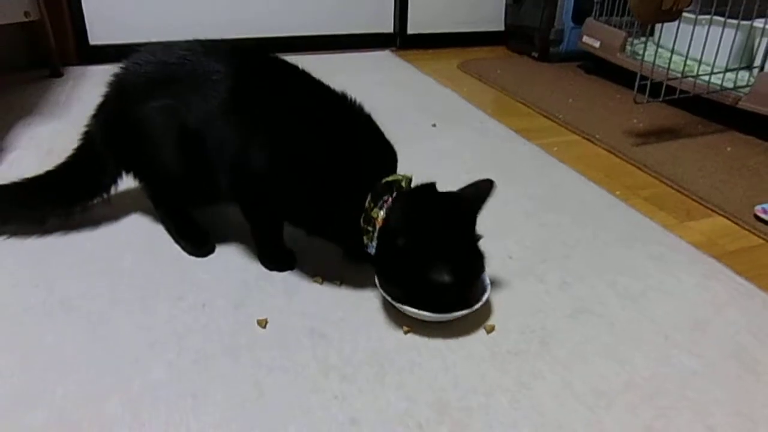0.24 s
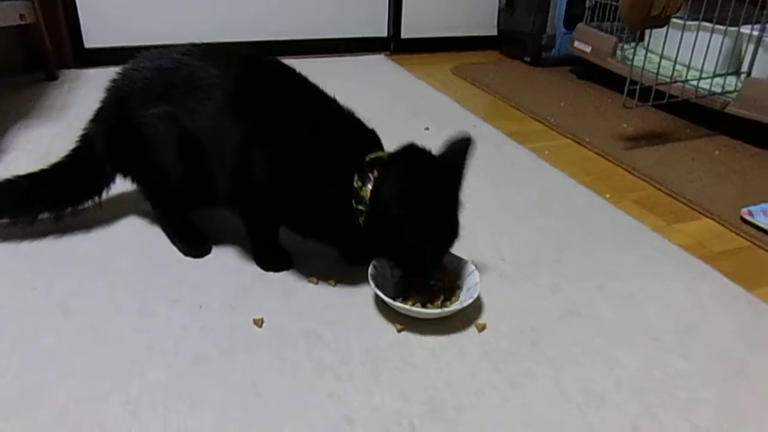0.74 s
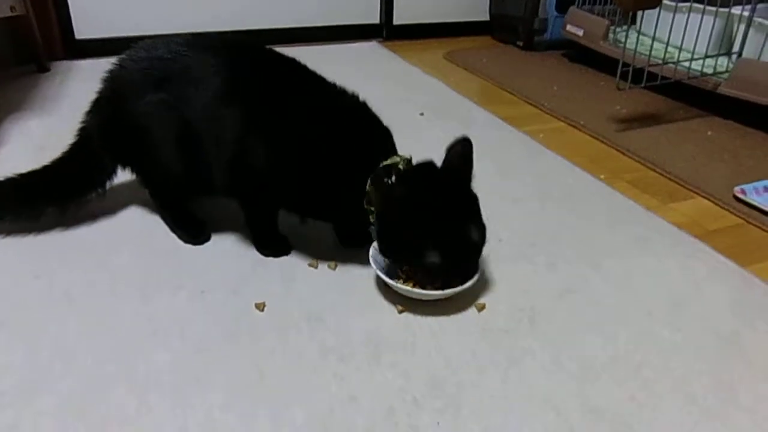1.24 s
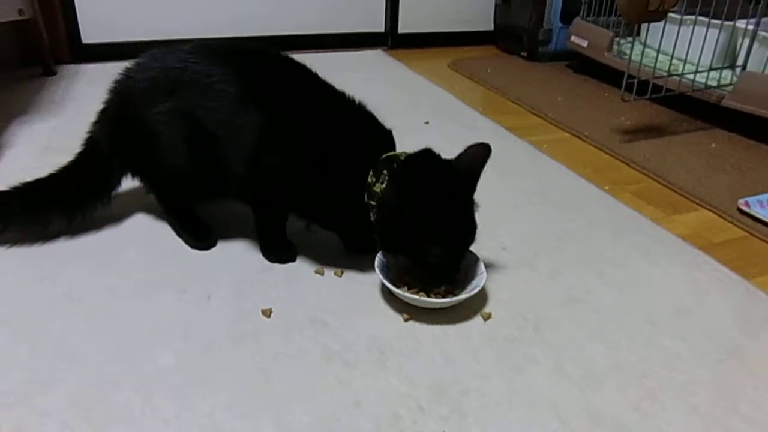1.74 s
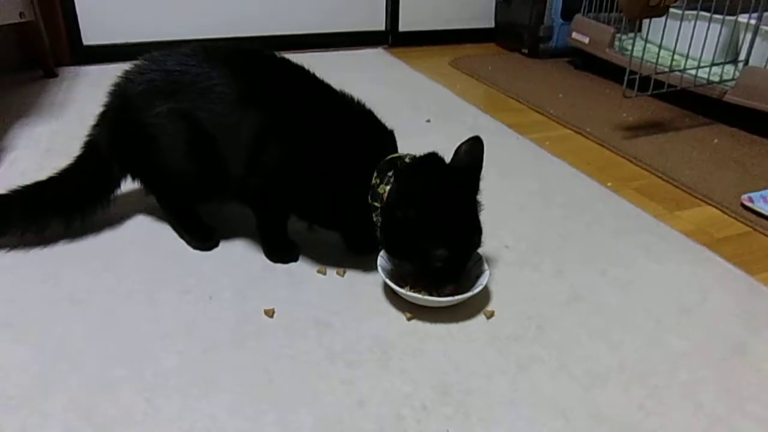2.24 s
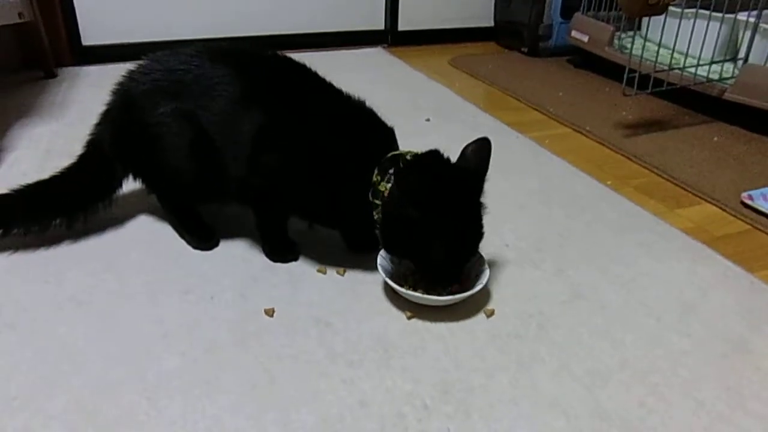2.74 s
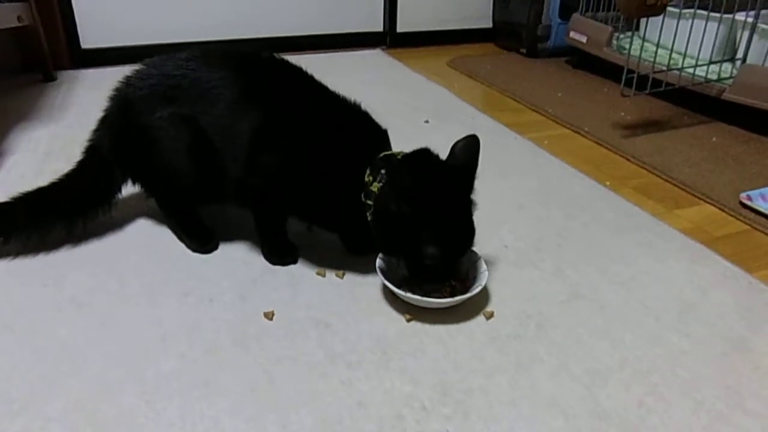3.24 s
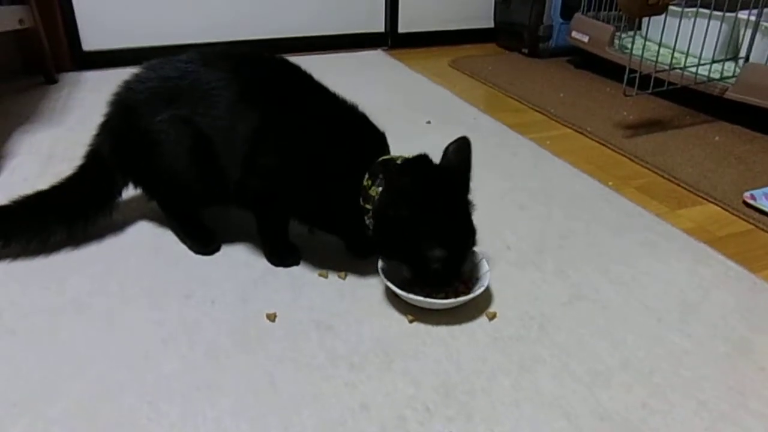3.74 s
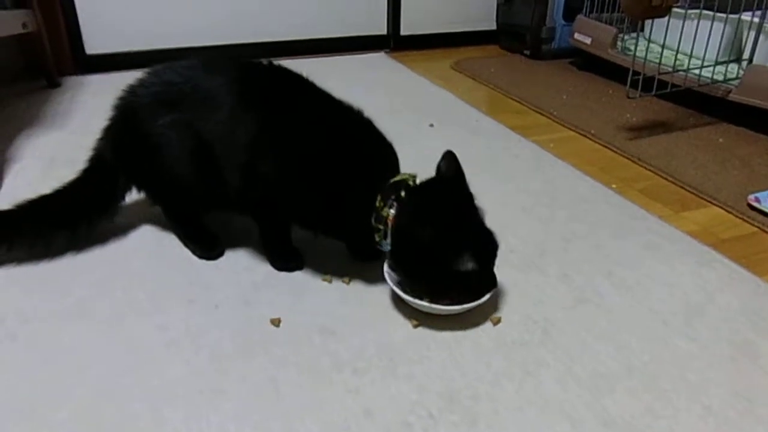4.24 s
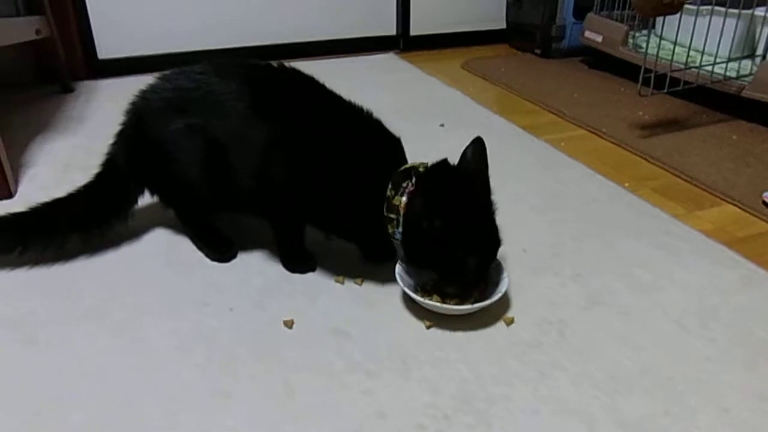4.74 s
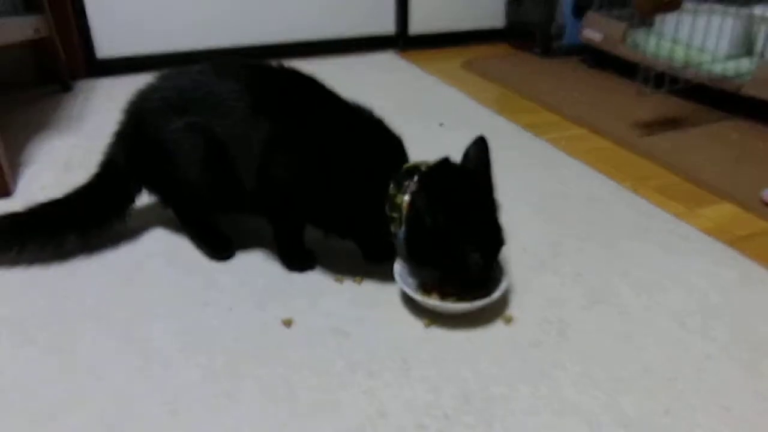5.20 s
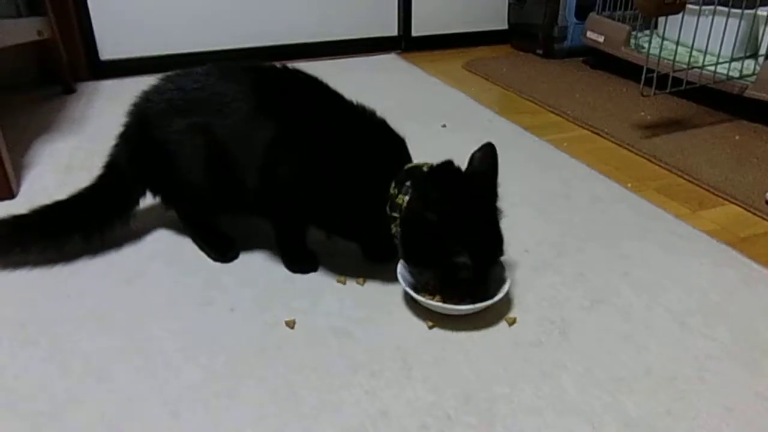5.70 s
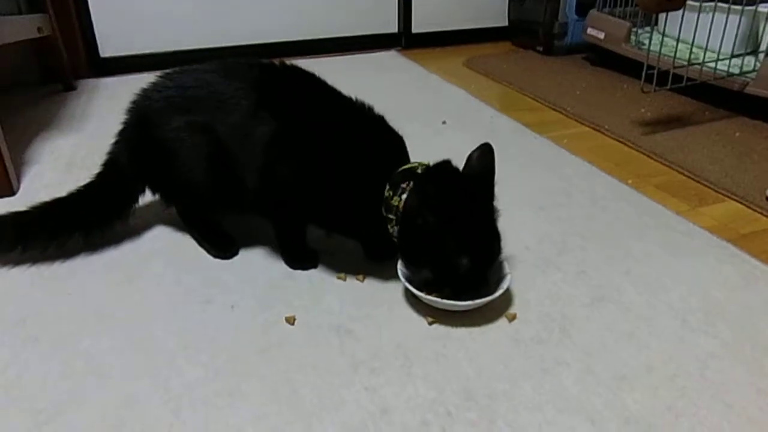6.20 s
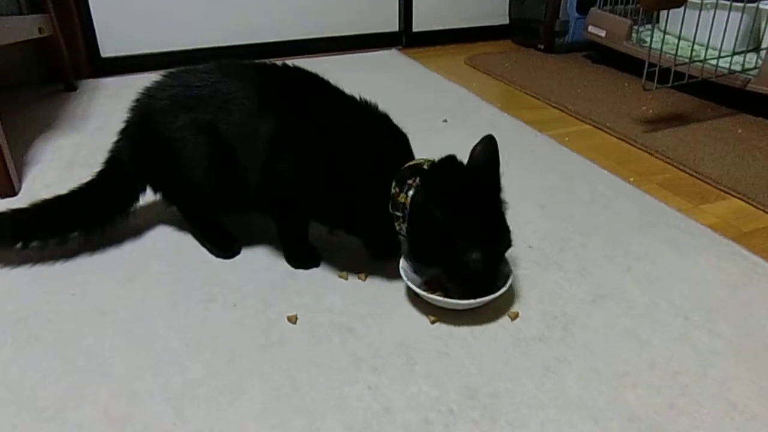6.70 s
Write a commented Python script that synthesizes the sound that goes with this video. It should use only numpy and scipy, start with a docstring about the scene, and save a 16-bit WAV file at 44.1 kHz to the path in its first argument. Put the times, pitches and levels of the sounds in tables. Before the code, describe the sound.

Over a low room hum, sharp little clinks and clicks come in bursts as a cat picks dry pellets out of a ceramic bowl. The pellets skitter and drop back, and some crack in its mouth amid quiet chewing and lapping. A faint collar tag and a few soft floor thuds join in. The knocks grow strongest toward the end, heard from nearby with slight small-room reverberation.

```python
"""Bright clinks and clicks come in clusters over a steady low background noise: a cat eats dry food from a
ceramic bowl on a mat. Teeth and pellets excite the bowl's normal modes, which ring until the next touch or the
muzzle damps them. Pellets tick and roll in the hollow and snap dully in the mouth, amid soft chewing and
lapping. A collar tag tinkles faintly, the floor thuds, and the small room reverberates."""
import sys
import numpy as np
from scipy import signal
from scipy.fft import rfft, irfft, next_fast_len
from scipy.io import wavfile
from scipy.ndimage import map_coordinates

SR = 44100
rng = np.random.default_rng(int(sys.argv[2]) if len(sys.argv) > 2 else 0)


def master_out(mix):
    """Clip the mix to full scale and print it as 16-bit PCM to the path in sys.argv[1]."""
    frames = np.transpose(np.atleast_2d(mix))
    ceiling = np.clip(frames, -1, 1)
    pcm = np.round(ceiling * 32767).astype(np.int16)
    wavfile.write(sys.argv[1], SR, pcm)


N = 306936


def amp(db):
    """Decibels as an amplitude ratio."""
    return 10 ** (np.asarray(db) / 20)


def unit(x):
    """Normalisation to an RMS of one."""
    return x / np.sqrt(np.mean(x ** 2))


def along(points, hz):
    """Interpolation of (frequency_hz, value) points on a logarithmic frequency axis."""
    f, values = np.transpose(points)
    return np.interp(np.log(hz + 1), np.log(f + 1), values)


def wobble(rate_hz):
    """Random modulation: Gaussian values joined by straight lines."""
    knots = rng.standard_normal(int(N * rate_hz / SR) + 4)
    return map_coordinates(knots, [np.arange(N) * rate_hz / SR], order=1)


def filtered(x, response):
    """Linear filtering: the spectrum is multiplied by a frequency response."""
    size = next_fast_len(len(x) + 8192)
    return irfft(rfft(x, size) * response(np.fft.rfftfreq(size, 1 / SR)), size)[:len(x)]


def resonance(hz, width_hz):
    """The band-pass response of a damped oscillator."""
    return lambda f: 1j * f * width_hz / (hz * hz - f * f + 1j * f * width_hz)


def mode(times, levels_db, hz, t60, rise_cycles, lost_db=0):
    """Free decay of one mode: each contact drives or damps it to a new level; lost_db adds damping."""
    t = np.arange(N) / SR
    spin = 2j * np.pi * hz
    decay = np.log(1000) * (t / t60 + lost_db / 60)
    decay_at_touch = np.interp(times, t, decay)
    swing, starts = 0, []
    for step, level in zip(np.diff(spin * times - decay_at_touch, prepend=0), amp(levels_db)):
        swing *= np.exp(step)
        level = max(level, amp(-53) * abs(swing))  # a touch removes at most 53 dB
        swing += max(level - abs(swing), 1e-9)  # the push shifts the phase
        swing *= level / abs(swing)  # the grip sets the amplitude
        starts.append(swing)
    last = np.maximum(np.searchsorted(times, t) - 1, 0)
    envelope = (t > times[0]) * np.exp(-np.abs(decay - decay_at_touch[last]))
    phasor = (starts * np.exp(-spin * times))[last] * envelope
    pole = np.exp(-hz / (rise_cycles * SR))  # finite contact time softens the onset
    return (signal.lfilter([1 - pole], [1, -pole], phasor) * np.exp(spin * t)).imag


def bursts(times, levels_db, t60, spiky=1):
    """Exponentially decaying noise of set energy; spiky above 1 breaks it into separate cracks."""
    t = np.arange(SR // 10) / SR
    out = np.zeros(N + len(t))
    for start_s, db in zip(times, levels_db):
        noise = rng.standard_normal(len(t))
        burst = amp(-60 * t / t60) * np.sign(noise) * np.abs(noise) ** spiky
        out[round(start_s * SR):][:len(t)] += amp(db) * burst / np.linalg.norm(burst)
    return out[:N]


def blips(rows, t60, phase_step_rad):
    """Damped sinusoids, roughened by a random walk of the phase."""
    out, t = np.zeros(N + SR), np.arange(SR // 10) / SR
    for start_s, db, hz in rows:
        drift = phase_step_rad * np.cumsum(rng.standard_normal(len(t)))
        out[round(start_s * SR):][:len(t)] += amp(db - 60 * t / t60) * np.sin(2 * np.pi * hz * t + drift)
    return out[:N]


# Spectrum of the background noise: frequency_hz, relative_density_db
HUM_SPECTRUM = [(12, -5.5), (20, 3.5), (92, -10), (298, -20.5), (427, -22), (1200, -26), (1980, -26.5),
                (2400, -28.5), (15500, -30)]


def hum():
    """Steady coloured noise, with slow amplitude modulation of its lowest rumble."""
    noise = unit(filtered(rng.standard_normal(N), lambda f: amp(along(HUM_SPECTRUM, f))))
    rumble = filtered(noise, lambda f: 1 / (1 + (f / 80) ** 2))
    waver = amp(2.5 * wobble(1.7))
    return amp(-59.5) * (noise + rumble * (waver - 1))


# Reverberation time of the room: frequency_hz, t60_s
ROOM_DECAY = [(500, 0.0695), (2000, 0.26), (4500, 0.19), (12000, 0.11)]


def room(x):
    """Reverberation: convolution with a noise tail in which each frequency decays at its own rate."""
    hz, t, spectrum = signal.stft(rng.standard_normal(SR // 2), SR, nperseg=256)
    decay = amp(-60 * t / along(ROOM_DECAY, hz)[:, None])
    tail = signal.istft(spectrum * decay, SR, nperseg=256)[1]
    delayed = np.pad(x, (180, 0))
    return signal.fftconvolve(delayed, tail / np.linalg.norm(tail))[:N]


# Pushes on the floor under the bowl: start_s, level_db
FLOOR_PUSHES = [(0.307, -41.5), (1.365, -40), (2.871, -48.5), (5.736, -35), (5.79, -40), (6.372, -40.5)]


def thuds():
    """Impulse response of the floor's lowest resonance."""
    push = np.zeros(N)
    for start_s, db in FLOOR_PUSHES:
        push[round(start_s * SR)] = amp(db + 43.5)
    board = resonance(hz=70.5, width_hz=48)
    return filtered(push, lambda f: board(f) ** 2)


# Modes of the metal collar tag: pitch_hz, level_db, t60_s
TAG_MODES = [(1450, -9, .12), (2950, 0, .16), (4877, -6, .12), (7332, -7, .05)]
# Swings of the tag as the head moves: start_s, level_db
TAG_SWINGS = [(.135, -62.5), (.339, -67), (0.442, -67), (.823, -71), (.979, -66), (1.03, -64), (1.391, -61),
              (1.961, -68), (3.53, -68), (5.449, -62.5)]


def tinkles():
    """Modal ringing of a small plate: each swing excites the tag's modes unevenly."""
    times, swing_db = np.transpose(TAG_SWINGS)
    chance_db = 3 * rng.standard_normal((len(times), len(TAG_MODES)))
    return sum(mode(times, swing_db + db + chance_db[:, k], hz, t60, rise_cycles=2.6)
               for k, (hz, db, t60) in enumerate(TAG_MODES))


# Soft chewing and lapping movements: centre_s, length_s, level_db
JAW_MOVES = [(0.16, 0.6, -68.5), (0.302, 0.03, -65), (0.83, 0.018, -76), (1.052, 0.89, -69.5),
             (1.265, 0.12, -66), (1.363, 0.067, -59), (1.686, 0.16, -69.5), (1.878, 0.2, -72),
             (1.97, 0.029, -68), (2.735, 0.033, -61.5), (3.055, 0.068, -66), (3.263, 0.11, -66),
             (3.794, 0.084, -63), (4.201, 0.045, -60), (4.343, 0.57, -67)]


def chewing():
    """Forced vibration: crumbling food drives the mouth, and food rubbed on the glaze drives the rim."""
    t = np.arange(N) / SR
    jaw = sum(amp(db) * np.exp(-(2 * (t - centre_s) / length_s) ** 2)
              for centre_s, length_s, db in JAW_MOVES)
    crumbs, friction = rng.standard_normal((2, N)) ** 3 * amp(5 * wobble(70))
    mouth = resonance(hz=1680, width_hz=1650)
    rim = lambda f: sum(resonance(BOWL_MODES[k][0][0], width_hz=30)(f) for k in (0, 1, 4))
    crunch = jaw * unit(filtered(crumbs, lambda f: mouth(f) ** 2 + amp(-12.5) * (f > 3500)))
    return crunch + amp(16) * filtered(jaw * unit(friction), rim)


# Wet clicks of the tongue: start_s, level_db, pitch_hz
TONGUE_CLICKS = [(0.1216, -59, 1610), (0.184, -57, 1400), (0.2893, -59, 1670), (0.5152, -60, 1386),
                 (1.2995, -62, 1480), (2.7115, -58, 1340), (4.168, -64.5, 1530)]


def smacks():
    """Damped oscillation: each click of the tongue is a brief, slightly rough tone."""
    return blips(TONGUE_CLICKS, t60=0.045, phase_step_rad=0.039)


# Pellets breaking in the mouth: start_s, level_db, pitch_hz
PELLET_SNAPS = [(.945, -43, 1190), (1.346, -35.5, 1160), (1.351, -38.5, 696), (1.979, -35.5, 2900),
                (3.452, -36, 600), (3.4528, -36.5, 2400), (3.76, -46, 1880), (5.9569, -16.5, 2190),
                (5.97, -45, 2300), (5.984, -51, 1900), (6.599, -34, 710), (6.601, -27.5, 2400)]


def snaps():
    """Brittle fracture: a bright edge of noise, and a cycle or two of the heavily damped mouth."""
    times, levels_db, _ = np.transpose(PELLET_SNAPS)
    out = filtered(bursts(times, levels_db - 4, t60=0.0067), resonance(hz=6700, width_hz=5000))
    t = np.arange(SR // 50) / SR
    for start_s, db, hz in PELLET_SNAPS:
        cycles = hz * t
        out[round(start_s * SR):][:len(t)] += amp(db - 3 - 13.3 * cycles) * np.sin(2 * np.pi * cycles)
    return out


# Pellets pressed against the glaze: start_s, level_db, pitch_hz
PELLET_CHIRPS = [(.2435, -42, 4200), (2.761, -26, 5900), (3.327, -25.5, 5510), (4.209, -42, 4460),
                 (5.225, -27.5, 5430), (5.254, -36, 5870), (5.677, -26.5, 6000)]


def chirps():
    """Contact vibration: a pressed pellet sounds briefly at its own pitch."""
    return blips(PELLET_CHIRPS, t60=0.017, phase_step_rad=0.073)


# Pellets dropping into the bowl: start_s, level_db
PELLET_DROPS = [(2.7616, -24.5), (2.7657, -37), (2.7861, -32), (3.2938, -34), (3.2973, -43), (3.2989, -38),
                (4.853, -37), (4.8587, -37), (4.861, -37), (4.8913, -40), (5.1907, -32), (5.1973, -30),
                (5.2, -33), (5.6773, -29), (5.9576, -39.5), (6.3226, -44), (6.7217, -33), (6.7284, -44)]


def drops():
    """Cavity resonance: each drop is one impulse into the air of the hollow."""
    times, db = np.transpose(PELLET_DROPS)
    push = np.zeros(N)
    push[np.round(times * SR).astype(int)] = amp(db + 29.5)
    air = resonance(hz=7100, width_hz=2300)
    return filtered(push, lambda f: air(f) ** 3)


# Single pellets rolling on the base: start_s, level_db
PELLET_ROLLS = [(0.432, -34), (0.455, -35), (.467, -37), (.528, -40), (.597, -38), (2.968, -33),
                (2.976, -35), (3.109, -36.5), (3.407, -29), (3.4433, -31), (3.501, -32.5), (3.5064, -35),
                (3.543, -38), (3.617, -40), (3.64, -37), (4.6588, -36), (4.9697, -32), (4.975, -30.5),
                (5.0583, -35.5), (5.391, -39), (5.5326, -34), (5.5737, -35), (5.926, -35), (6.9253, -31.5),
                (6.932, -32), (6.9367, -32.5)]


def rolls():
    """Selective excitation: a rolling pellet rings only modes of the base, and unevenly."""
    times, roll_db = np.transpose(PELLET_ROLLS)
    ring = sum(mode(times, roll_db + db - 26.5, hz, t60 * 0.57, rise_cycles=2.7)
               for hz, db, t60 in BOWL_MODES[BASE][:3])
    return ring * amp(5 * wobble(250))


def ticks():
    """Impact noise: pellets click, skitter and roll, coloured by the hollow, the base and the glaze."""
    touch_s, tick_db = np.transpose(TOUCHES)[[0, -1]]
    roll_s, roll_db = np.transpose(PELLET_ROLLS)
    click = bursts(touch_s, tick_db + 15, t60=0.018, spiky=2.5)
    skitter = bursts(touch_s, tick_db + 13, t60=0.084, spiky=2.5)
    tumble = bursts(roll_s, roll_db + 5, t60=0.012, spiky=2.5)
    hollow = resonance(hz=6460, width_hz=2460)
    base = resonance(BOWL_MODES[BASE][0][0], width_hz=1620)
    glaze = resonance(hz=13300, width_hz=3500)
    force = click + skitter + tumble
    return filtered(force, lambda f: hollow(f) ** 3 + amp(-3) * base(f) + amp(-10) * glaze(f) ** 2)


def blows():
    """Broadband transients: a blow on the rim cracks, and knocks the bowl against the mat."""
    times, rim_db = np.transpose(TOUCHES)[0], family_levels()[RIM_4]
    crack = filtered(bursts(times, rim_db + 7.5, t60=0.07), resonance(hz=4900, width_hz=14300))
    knock = filtered(bursts(times, rim_db + 9.5, t60=0.1), resonance(hz=327, width_hz=1020))
    return crack + knock


# Teeth and pellets touching the bowl:
# start_s, strength_db, hardness_db_per_octave, rim_place_deg, base_ring_db, pellet_tick_db
TOUCHES = [(0.123, -56, 4, 72, -53, -60.0), (0.138, -58, 13, 70, -51, -45),
           (0.2054, -37.5, -0.5, 112.5, -70.0, -53), (0.214, -37, 1, 135, -65.0, -22),
           (0.227, -47, 8, 73, -70, -57.0), (0.2435, -63, 8, 143, -71.0, -47.0),
           (0.3096, -37.5, 4, 23.5, -68, -24.5), (0.343, -51, 2, 42, -82.0, -45.0),
           (0.995, -70.5, -11, 112, -82.0, -72.0), (1.113, -63, 0, 150, -83.0, -71.0),
           (1.1971, -36.5, 5.5, 136, -68, -60), (1.218, -45, 0, 33, -87.0, -57.0),
           (1.285, -54.5, -5, 121, -89.0, -36.5), (1.3176, -56, 0, 114, -77.0, -59),
           (1.366, -59, -6, 34.0, -76.0, -39), (1.406, -28.5, 7, 139, -53, -33),
           (1.425, -45, 1, 134, -72.0, -37), (1.444, -53.5, 3, 44, -71.0, -59.0),
           (1.482, -43.5, 4, 84, -49, -33), (1.52, -54, -1.5, 44, -67, -46),
           (1.8215, -60.5, -1.5, 168, -82.0, -53), (2.105, -59, 0.5, 141.0, -86.0, -39),
           (2.2817, -47.5, 2.5, 142, -59, -27), (2.2892, -45, -1, 75, -47, -26.5),
           (2.3314, -62, -9.5, 140, -48.5, -47.0), (2.3702, -29.5, 4, 98.5, -49.5, -59.0),
           (2.4431, -49, -3.5, 101.5, -58, -51), (2.7542, -37.5, 6.5, 115.5, -59, -59.0),
           (2.76, -38, 1, 101.5, -66.0, -25), (2.7799, -34.5, 3, 108, -62.0, -46),
           (2.784, -36.5, 3.5, 85.5, -71.0, -24), (2.829, -52.5, -1.0, 152, -48, -43),
           (2.8633, -27.5, 4, 121.5, -53, -20), (2.8921, -33, 6.5, 147, -71.0, -49.0),
           (2.902, -37, 2.5, 139, -46.5, -35), (2.9388, -56, -3, 89, -54, -44.0),
           (3.2887, -42.5, -2, 26, -48, -46), (3.2954, -37.5, 0, 150, -47, -19),
           (3.316, -35, 2, 73.5, -34, -33), (3.3264, -37, -0.5, 58.5, -61, -28),
           (3.345, -47.5, -2, 97, -46, -42.0), (3.3709, -66, 2, 168, -47.5, -40.0),
           (3.3802, -51.5, -1.0, 176, -44.5, -50), (3.388, -53.5, 10, 152, -61, -37),
           (4.1905, -53, -10.5, 121, -82.0, -54.0), (4.1966, -43.5, -5.5, 32.5, -76.0, -38),
           (4.207, -58.5, -2, 98, -76, -56), (4.368, -64, -1, 118, -80, -41),
           (4.3896, -48.5, -2.5, 103, -71, -33), (4.4116, -28.5, 3.5, 116.5, -46, -33),
           (4.425, -35, 3, 150.5, -65, -39), (4.5343, -55.5, 2.5, 73.5, -54, -40),
           (4.8529, -50, -8.5, 108, -48, -29), (4.859, -31, 3, 141, -44, -21),
           (4.861, -36.5, 3.5, 74.0, -63, -31), (4.8861, -40.5, 7, 99.5, -47, -18),
           (4.8872, -39.5, 1.5, 106.5, -42, -30), (4.914, -60, -5, 44, -65, -24),
           (4.9466, -54.5, 2, 5.5, -49, -35), (5.1902, -41, -1.5, 105, -50, -40),
           (5.198, -36, 10, 140, -41, -34), (5.2012, -37, 3.5, 37.5, -54, -24),
           (5.2147, -34.5, 7, 141.0, -42, -24), (5.224, -43, 4.5, -5, -53, -27),
           (5.25, -52, 0.5, 79, -74, -46), (5.2777, -59, 14, 145, -48, -37),
           (5.2918, -59, -3, 97, -66, -52), (5.319, -58.5, 2.5, 97, -76.0, -38.5),
           (5.6673, -50.5, -7.5, 115, -51, -54), (5.6757, -37, 2.5, 150, -63.0, -25),
           (5.691, -59.5, -6, 155, -72.0, -50), (5.733, -29.5, -1.5, 19.5, -74.0, -19),
           (5.7757, -24.5, 3, 22.5, -61, -12), (5.8264, -21, 1.5, 18.5, -62.0, -26),
           (5.9177, -54.5, -3.0, 181, -48.5, -43), (5.9566, -65.5, -9.5, 154, -68, -52),
           (6.3225, -47.5, -5.5, 32.5, -48, -35), (6.3312, -44, 0, 75, -44, -31.5),
           (6.3727, -24.5, -1, 112.5, -55.0, -15), (6.3962, -28, -0.5, 28, -61, -21),
           (6.41, -36, 1.5, 149.5, -70.0, -34), (6.555, -62.5, -3, 36, -77, -60),
           (6.724, -46, -1.5, 53, -38.5, -29), (6.7288, -38, 1, 56.5, -34, -43),
           (6.7329, -40, 0, 154, -40, -27), (6.7894, -40, -0.5, 9.5, -52, -27.5),
           (6.812, -45.5, 6, 143, -57, -72)]
# Standing waves around the rim: family_index, nodal_diameters, phase_deg
RIM_SHAPES = [(0, 2, 137), (1, 3, 137), (3, 4, 0), (4, 4, 90), (5, 5, 92), (6, 0, 0), (7, 3, 47),
              (8, 2, 47)]
# Strength of each of those standing waves: gain_db
RIM_GAINS = [-6, 1, 2.5, 7, 5.5, -13, -1, -17.5]


def family_levels():
    """Modal coupling, in dB per family and touch: weak near a node, and tilted in pitch by hardness."""
    _, strength_db, hardness, place_deg, base_db, _ = np.transpose(TOUCHES)
    pivot_hz, power_at_node = 6500, 0.01
    levels = {BASE: base_db}
    for (family, diameters, phase_deg), gain_db in zip(RIM_SHAPES, RIM_GAINS):
        coupling = np.cos(np.radians(diameters * place_deg - phase_deg)) ** 2 + power_at_node
        octaves = np.log2(np.mean([hz for hz, _, _ in BOWL_MODES[family]]) / pivot_hz)
        levels[family] = strength_db + gain_db + hardness * octaves + 10 * np.log10(coupling)
    return [levels[family] for family in range(len(BOWL_MODES))]


# Modes of the bowl, a list per family: pitch_hz, level_db, t60_s
# Families: rim 1, rim 2, base, rim 3a, rim 3b, rim 4, top, mat-damped partners of rim 2 and rim 1
BOWL_MODES = [
    [(1852, 0, .31)],
    [(3866, 0, .33)],
    [(5010, 0, .13), (12450, -4, .07), (5130, -6, .07), (12040, -17, .2)],
    [(6391, 0, .1)],
    [(6541, 0, .1)],
    [(9644, 0, .1)],
    [(12030, -7, .085), (13325, -3, .08), (14150, -9, .1), (15340, -11, .11)],
    [(3888, 0, .06)],
    [(1886, 0, .13)],
]
BASE, RIM_4, TOP = 2, 5, 6
# The muzzle leaning on the rim: start_s, loss_db
MUZZLE_LEANS = [(.23, 11), (1.226, 16), (1.295, 14), (1.325, 12), (1.35, 4), (1.85, 27), (3.335, 7),
                (4.225, 17), (4.39, 23), (4.417, 13), (4.92, 15), (5.235, 18), (5.742, 7), (5.785, 14),
                (5.832, -2.5), (6.338, 7), (6.5, 11), (6.744, 7)]
# Sensitivity of each family to the muzzle: loss_factor
MUZZLE_FACTORS = [0.29, 1.3, 0.498, .7, 0.45, 0.78, .4, .3, 0.33]


def bowl():
    """Superposition of normal modes, damped by the muzzle and set fluttering by loose food."""
    times, t = np.transpose(TOUCHES)[0], np.arange(N) / SR
    chance_db = 5 * rng.standard_normal((len(times), 4))  # the top modes vary from touch to touch
    lean_s = 0.031
    muzzle_db = sum(db * np.clip((t - start_s) / lean_s, 0, 1) for start_s, db in MUZZLE_LEANS)
    since_touch_s = np.abs(t - times[np.maximum(np.searchsorted(times, t) - 1, 0)])
    flutter_db = 3.5 * (1 - np.exp(-since_touch_s / 0.03))  # deepens as the ring fades
    out = np.zeros(N)
    for family, (touch_db, factor) in enumerate(zip(family_levels(), MUZZLE_FACTORS)):
        flutter = amp(flutter_db * wobble(120))
        for k, (hz, db, t60) in enumerate(BOWL_MODES[family]):
            levels_db = touch_db + db + chance_db[:, k] * (family == TOP)
            out += flutter * mode(times, levels_db, hz, t60, rise_cycles=1, lost_db=factor * muzzle_db)
    return out


def scene():
    """Direct sound adds to the reverberation of the rings, clicks and snaps, in one channel."""
    ring = bowl() + rolls() + tinkles()
    click = ticks() + drops() + blows() + chirps()
    snap = snaps()
    mouth = chewing() + smacks()
    reverberation = room(amp(-20) * ring + amp(-10.5) * click + amp(-5) * snap)
    return (ring + click + snap + reverberation + mouth + thuds() + hum())[None]


def record(dry):
    """Band limiting: a steep shelf lowers the highest treble, and nothing passes above the cutoff."""
    shelf_hz, cutoff_hz = 15840, 16900
    shelf = lambda f: amp(-30 / (1 + np.exp((shelf_hz - f) / 40)))
    return filtered(dry[0], lambda f: (f < cutoff_hz) * shelf(f))[None]


dry = scene()
out = record(dry)
master_out(out)
```